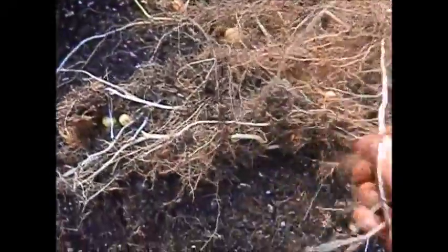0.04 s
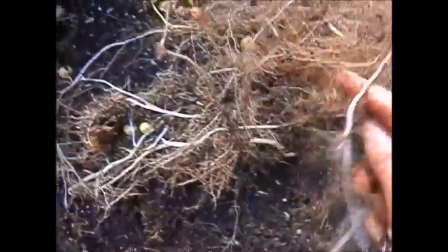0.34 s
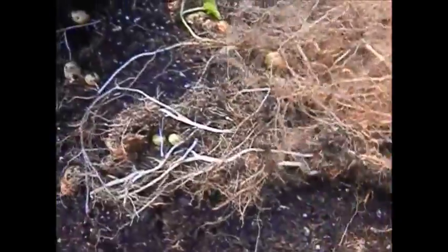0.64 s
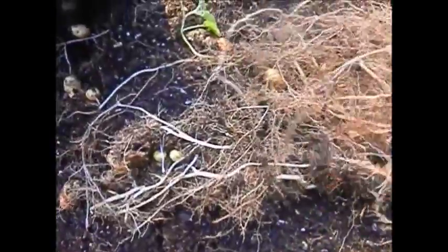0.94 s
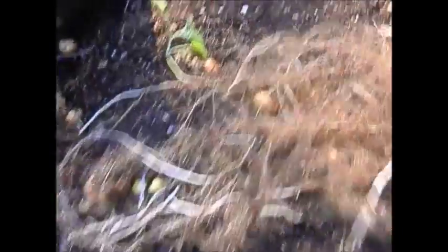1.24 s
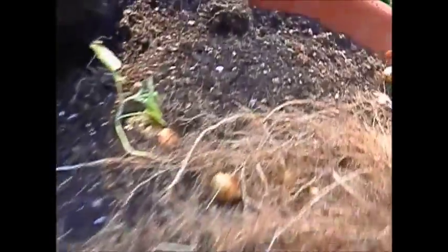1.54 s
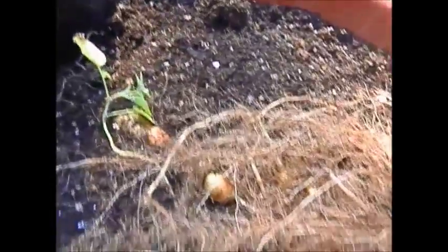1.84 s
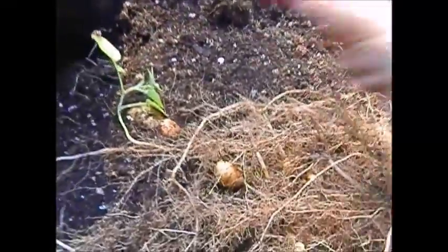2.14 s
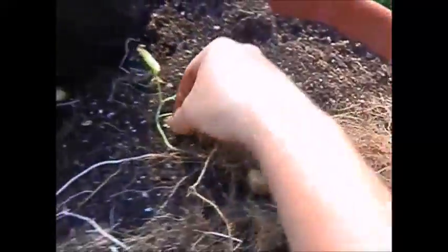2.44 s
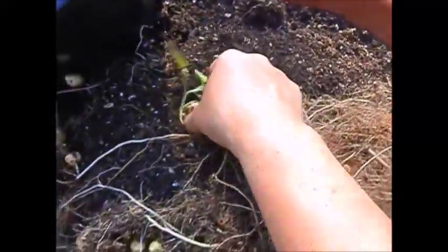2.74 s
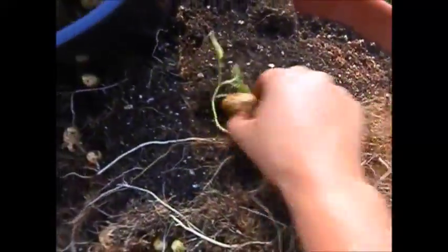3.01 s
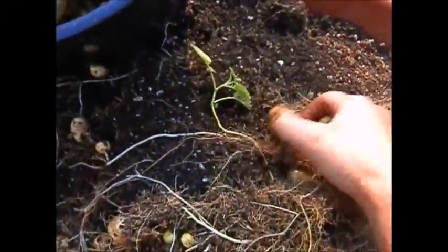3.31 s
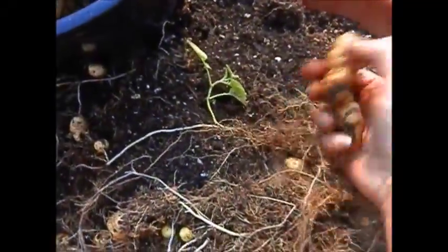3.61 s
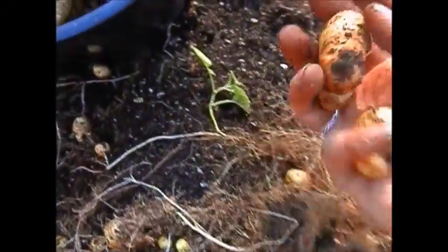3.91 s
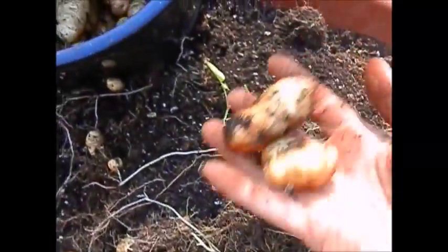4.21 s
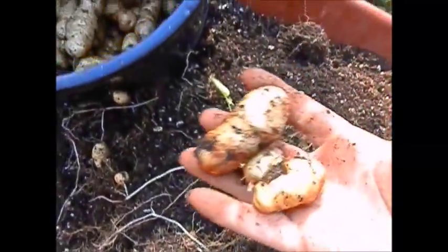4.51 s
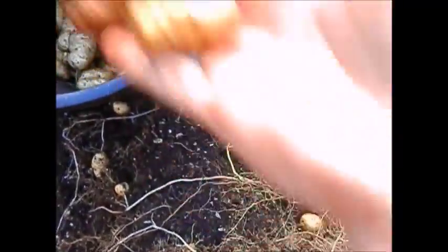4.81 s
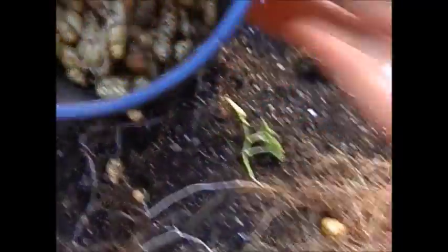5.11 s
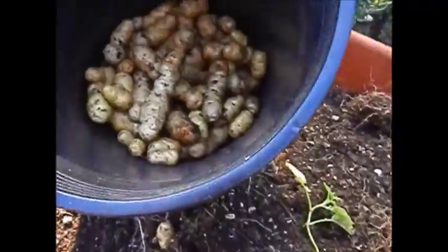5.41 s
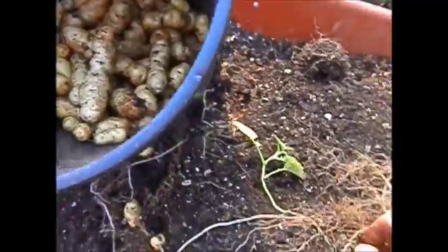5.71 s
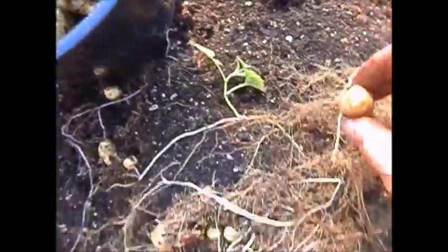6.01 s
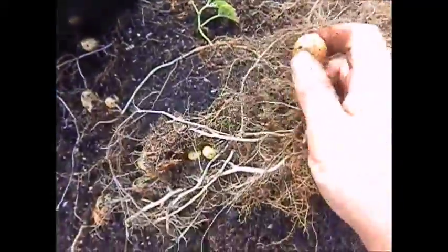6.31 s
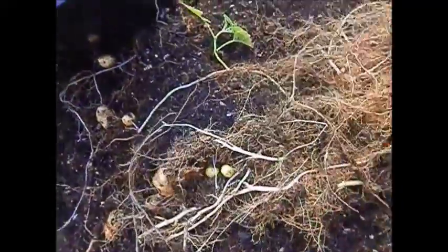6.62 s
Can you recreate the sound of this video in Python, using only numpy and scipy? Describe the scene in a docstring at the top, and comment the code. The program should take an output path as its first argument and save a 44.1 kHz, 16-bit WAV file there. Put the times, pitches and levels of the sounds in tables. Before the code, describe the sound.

Outdoors, distant engines hold a low, wavering drone. Close by, a hand rustles faintly through dry roots in potting soil, with brief crisp tears and a small snap. After a quieter stretch, a handful of potatoes tumbles into a plastic bucket with quick hollow knocks, the loudest event, ending in a sharp crack. Soft rustling and another snap follow. A camera lens ticks faintly beside the microphone in spells.

```python
"""Dry roots rustle and tear under a hand pulling small potatoes out of potting soil, outdoors.
About five seconds in, the potatoes drop into a plastic bucket, knocking and setting it ringing.
Far off, two engines drone and beat against each other, slowly speeding up.
Close to the microphone, the camera's lens mechanism ticks faintly, in spells, on a 15 Hz clock."""
import sys
import numpy as np
from scipy import signal
from scipy.fft import rfft, irfft
from scipy.io import wavfile
from scipy.ndimage import map_coordinates

SR = 44100
rng = np.random.default_rng(int(sys.argv[2]) if len(sys.argv) > 2 else 0)


def store_pcm(level_fs):
    """Save levels as 16-bit WAV."""
    pcm = np.round(np.clip(level_fs, -1, 1) * 32767).astype(np.int16)
    wavfile.write(sys.argv[1], SR, np.atleast_2d(pcm).T)


N = 297675
TIME = np.arange(N) / SR


def amp(db):
    """Decibels to gain."""
    return 10 ** (np.asarray(db) / 20)


def unit(x):
    """Scales to rms 1."""
    return x / np.sqrt(np.mean(x ** 2) + 1e-20)


def blow(x):
    """Scales a short sound to the energy of 5 ms at rms 1."""
    return x / np.sqrt(np.sum(x ** 2) / (.005 * SR))


def add(mix, s, sound):
    """Puts a sound into the mix at s seconds."""
    part = mix[max(round(s * SR), 0):][:len(sound)]
    part += sound[:len(part)]


def curves(rows):
    """Each column of a table of (seconds, ..) rows, at every sample."""
    s, *columns = np.transpose(rows)
    return [np.interp(TIME, s, c) for c in columns]


def wander(rate):
    """Smooth random drift of rms near 1, changing about rate times a second."""
    knots = rng.standard_normal(512)
    grid = np.arange(0, N + 256, 256)
    drift = map_coordinates(knots, [grid / SR * rate], mode="wrap")
    return np.interp(np.arange(N), grid, drift)


def movements(rows):
    """Gain over time of movements that each swell to a peak and die away a little faster."""
    power = np.zeros(N)
    for s, length, db in rows:
        away = (TIME - s) / (length * np.where(TIME < s, 0.67, 0.5))
        power += (amp(db) / (1 + away ** 2 / 2) ** 2) ** 2
    return np.sqrt(power)


def response(points, hz):
    """Gain of a (Hz, dB) spectrum at the given frequencies."""
    f, db = np.transpose(points)
    return amp(np.interp(np.log(hz + 1), np.log(f), db))


def coloured(x, points):
    """Gives a long sound a spectrum; rms 1."""
    gain = response(points, np.fft.rfftfreq(len(x), 1 / SR))
    return unit(irfft(rfft(x) * gain, len(x)))


def impulse(points, corner_hz=np.inf, size=2048):
    """Causal click with this spectrum; a soft contact dulls it above the corner."""
    hz = abs(np.fft.fftfreq(size, 1 / SR))
    log_gain = np.log(response(points, hz) / (1 + (hz / corner_hz) ** 2) ** 2)
    return np.fft.ifft(np.exp(signal.hilbert(log_gain).conj())).real


def burst(t60, rise, size=2048):
    """Noise that swells quickly and dies: the dense ringing of a small object."""
    t = np.arange(size) / SR
    return rng.standard_normal(size) * amp(-60 * t / t60) * (1 - np.exp(-t / rise))


def ring(modes, corner_hz=np.inf, detune=0, size=8192):
    """Dying (Hz, dB, t60) modes, optionally detuned; a soft contact weakens the high ones."""
    out, t = np.zeros(size), np.arange(size) / SR
    for hz, db, t60 in modes:
        pitch = hz * (1 + detune * rng.uniform(-1, 1))
        out += amp(db - 60 * t / t60) * np.sin(2 * np.pi * pitch * t) / (1 + (hz / corner_hz) ** 2)
    return out


def crackle(count, per_s, spread_db):
    """A train of tiny breaks, most small and a few large."""
    sizes = amp(spread_db * np.minimum(rng.exponential(1, count), 4))
    return unit(rng.standard_normal(count) * sizes * (rng.random(count) < per_s / SR))


# Open air with microphone hiss, and handling rumble. Each row: frequency in Hz, relative level in dB.
AIR_COLOUR = [(20, -3), (50, -1), (130, 3), (200, -7), (330, -10), (480, -11), (650, -15), (850, -19),
              (1200, -29.5), (2000, -40), (4000, -43), (6000, -43), (9000, -34), (15000, -31.5)]
RUMBLE_COLOUR = [(15, -10), (27, 3), (42, 7), (70, 1), (150, 2), (400, -43.5)]
# Sways of the hand-held camera. Each row: peak time and length in seconds, level in dB.
CAMERA_BUMPS = [(4.7, 0.2, -45), (5.11, 0.12, -26.5), (5.345, 0.12, -32.5), (5.8, 0.6, -44),
                (6.36, 0.31, -40.5)]

def air():
    """Steady distant wash and hiss, with a low rumble as the camera moves."""
    wash = amp(-44 + 0.16 * wander(3.8)) * coloured(rng.standard_normal(N), AIR_COLOUR)
    rumble = movements(CAMERA_BUMPS) * coloured(rng.standard_normal(N), RUMBLE_COLOUR)
    return wash + rumble


def engine_order(rate, multiple, fading, fade_rate):
    """One harmonic of the firing rate, rms 1; the moving air shifts its level and phase."""
    angle = 2 * np.pi * (multiple * np.cumsum(rate) / SR + rng.random())
    in_phase = (1 + fading * wander(fade_rate)) * np.cos(angle)
    return unit(in_phase + fading * wander(fade_rate) * np.sin(angle))


# Two engines, far off. Each row: time in seconds, firing rate of the first and the second in Hz.
FIRING_RATES = [(0, 15.56, 17.0), (1.1, 15.58, 17.04), (1.8, 15.78, 17.25), (3.0, 15.42, 17.08),
                (4.2, 15.9, 17.48), (5.5, 16.25, 17.88), (6.75, 17.41, 19.06)]
# The first one's drone. Each row: multiple of its rate, base level in dB at low and at high revs.
FIRST_ORDERS = [(4, -41, -42), (5, -42.5, -46), (7, -46.5, -46.5), (8, -38, -45), (9, -43, -48.5),
                (11, -49.5, -52), (12, -49.5, -46), (16, -58, -52.5)]
# The second one's drone, and the first one's whine. Each row: multiple of the rate, base level in dB.
SECOND_ORDERS = [(3, -83), (4, -56), (5, -45), (7, -38), (8, -50.5), (9, -58.5), (11, -46.5), (15, -65),
                 (17, -76)]
WHINE_ORDERS = [(30, -6.5), (32, -13.5), (36, -2.5), (37, -1.5), (40, 0.5), (41, -5), (44, -8.5),
                (45, -8.5), (49, -11.5)]
# How the air carries them to the microphone. Each row: time in seconds, then gains in dB
# for the second engine, the whine and the top orders of the first engine's drone.
AIR_CARRY = [(0, 3.5, -62.5, -12), (1.1, 1, -61.5, 0.5), (2.7, -4, -60.5, -3.5), (3.6, 3, -63, -3),
             (4.7, -6, -51.5, 4), (5.7, -11, -53, 2), (6.2, -7.5, -58.5, 0), (6.75, -6.5, -65, -20)]

def engines():
    """Two stacks of low orders beat, a little apart in speed, under a rougher whine."""
    first_hz, second_hz = curves(FIRING_RATES)
    second_db, whine_db, top_db = curves(AIR_CARRY)
    idle_hz, revved_hz = 15.6, 16.15
    revs = np.clip((first_hz - idle_hz) / (revved_hz - idle_hz), 0, 1)
    first = np.zeros(N)
    for k, low, high in FIRST_ORDERS:
        level_db = low + revs * (high - low) + top_db * (k >= 12)
        first += amp(level_db) * engine_order(first_hz, k, fading=.26, fade_rate=3)
    second = sum(amp(db) * engine_order(second_hz, k, fading=.78, fade_rate=2.212)
                 for k, db in SECOND_ORDERS)
    whine = sum(amp(db) * engine_order(first_hz, k, fading=.99, fade_rate=14) for k, db in WHINE_ORDERS)
    return first + amp(second_db) * second + amp(whine_db) * whine


# The lens hunting for focus. Each row: start and end in seconds, level in dB, share of beats that tick.
FOCUS_HUNTS = [(0.62, 0.8, -53, 0.9), (1.42, 2.12, -58, 0.7), (2.15, 2.8, -52.5, 0.96),
               (3.15, 3.46, -52, 1.0), (3.75, 4.13, -53.5, 0.85), (4.42, 4.95, -52, 0.5),
               (5.42, 6.27, -48.5, 0.99)]
# Its large moves. Each row: time in seconds, level in dB, number of steps.
FOCUS_MOVES = [(0.04, -48.5, 1), (0.17, -48.5, 1), (0.3, -48.5, 1), (0.57, -48.5, 4), (0.9, -50.5, 2),
               (1.24, -45.5, 1), (1.37, -52, 1), (1.57, -51, 1), (1.9, -51, 1), (2.31, -47.5, 1),
               (2.71, -47, 1), (2.97, -45.5, 3), (3.11, -46.5, 2), (3.57, -51, 1), (3.71, -50.5, 1),
               (4.31, -50, 1), (4.71, -47, 1), (5.38, -45.5, 3), (5.58, -47.5, 3), (5.71, -43.5, 1),
               (5.91, -42.5, 1), (6.04, -42.5, 1), (6.31, -43, 1), (6.58, -46.5, 1)]

def lens_moves():
    """(seconds, dB, steps) of small hunting steps and large moves, all on the lens's 15 Hz clock."""
    clock = np.arange(0.0355, N / SR, 0.066748)
    chance = rng.random(len(clock))
    moves = {}
    for start, end, db, share in FOCUS_HUNTS:
        for s in clock[(start <= clock) & (clock <= end) & (chance < share)]:
            moves[s] = (db, 1)
    for s, db, steps in FOCUS_MOVES:
        nearest_beat = clock[np.argmin(abs(clock - s))]
        moves[nearest_beat] = (db, steps)
    return [(s, db, steps) for s, (db, steps) in moves.items()]


# The lens's rattle, right beside the microphone. Each row: frequency in Hz, relative level in dB.
TICK_COLOUR = [(300, 6), (700, 18), (1200, 0), (1500, 0), (1850, 1.5), (2400, -0.5), (2850, -0.5),
               (3250, -13.5), (3700, 1.5), (4400, 2), (5100, -1), (5600, -1.5), (6600, -3), (7500, -3.5),
               (8700, -2.5), (10500, -3), (15000, -14)]
# The camera body's modes. Each row: frequency in Hz, relative level in dB, t60 in seconds.
CAMERA_MODES = [(1219, 4.5, 0.075), (1841, 3.5, 0.059), (2005, -1.5, 0.075), (2410, -1.5, 0.073),
                (4486, -3.5, 0.081), (4710, 8, .025), (8410, 7, 0.02)]

def lens():
    """The lens moves one step or a few in quick succession; each rattles and rings the camera body."""
    out, body = np.zeros(N), impulse(TICK_COLOUR)
    step_gap_s = .0047
    for s, db, steps in lens_moves():
        for onset in s + step_gap_s * np.arange(round(steps)):
            rattle = burst(t60=0.016, rise=0.00075) + amp(-19.5) * burst(t60=0.082, rise=0.0022)
            add(out, onset, amp(db + 5) * blow(signal.fftconvolve(rattle, body)))
            add(out, onset, amp(db - 1) * blow(ring(CAMERA_MODES, detune=0.036, size=2048)))
    return out


# A stem scraping in the pot. Each row: peak time and length in seconds, level in dB.
STEM_SCRAPES = [(0.42, 0.19, -64.5), (0.68, 0.17, -71)]
# Its rasp. Each row: frequency in Hz, relative level in dB.
SCRAPE_COLOUR = [(1200, -14), (1750, -7), (2050, 0), (2350, -30), (3500, -45)]

def stem():
    """A stiff stem slips over the soil with a faint, narrow rasp."""
    return movements(STEM_SCRAPES) * coloured(crackle(N, per_s=540, spread_db=-2), SCRAPE_COLOUR)


# The hand down in the pot. Each row: start in seconds, level in dB, upper resonance in Hz,
# its relative level in dB.
POT_SCUFFS = [(1.163, -36.5, 720, -15), (1.304, -35.5, 1500, -10), (1.313, -39.5, 1690, -15)]

def scuffs():
    """A brief rub excites the pot's hollow resonance and an upper one."""
    out, t = np.zeros(N), np.arange(1024) / SR
    hollow_hz = 453
    for s, db, upper_hz, upper_db in POT_SCUFFS:
        for hz, level_db in ((hollow_hz, db), (upper_hz, db + upper_db)):
            resonance = t * ring([(hz, 0, .005)], size=len(t))  # swells first, so its skirts are steep
            rub = burst(t60=0.026, rise=0.0016)
            add(out, s, amp(level_db) * blow(signal.fftconvolve(rub, resonance)))
    return out


# Nearby, the hand strokes through the roots and drags their mat over the soil.
# Each row: peak time and length in seconds, level in dB.
HAND_STROKES = [(0.04, 0.43, -53), (0.65, 0.46, -58), (1.03, 0.25, -52.5), (1.42, 0.39, -57),
                (2.25, 0.5, -63), (2.65, 0.28, -59), (3.72, 0.2, -62.5), (5.2, 0.39, -65),
                (5.75, 0.63, -65.5), (6.19, 0.31, -55.5), (6.54, 0.17, -57)]
MAT_DRAGS = [(0.01, 0.095, -49), (0.36, 0.28, -63), (0.65, 0.27, -69), (1.37, 0.09, -51), (1.6, 0.26, -81)]
# The bright rustle and the dull rub. Each row: frequency in Hz, relative level in dB.
ROOT_COLOUR = [(400, -51), (1200, -7), (2500, -9), (4000, -7.5), (6000, -3.5), (8500, 7), (11000, 3.5),
               (13000, 2), (16000, -10)]
DRAG_COLOUR = [(200, 1), (500, 13.5), (1200, -2.5), (1900, -1.5), (2400, -15), (3500, -23), (8000, -52)]

def roots():
    """Dry roots and crumbs crackle under the hand; the mat rubs over the soil."""
    stir = np.hypot(movements(HAND_STROKES), amp(-69))  # the floors: roots settling between movements
    drag = np.hypot(movements(MAT_DRAGS), amp(-72))
    fine = amp(2 * wander(40)) * crackle(N, per_s=4500, spread_db=2.5)
    coarse = crackle(N, per_s=70, spread_db=3.5)
    rustle = stir * coloured(fine + amp(-5) * coarse, ROOT_COLOUR)
    rub = drag * amp(2 * wander(28.8)) * coloured(crackle(N, per_s=1600, spread_db=-2.5), DRAG_COLOUR)
    return rustle + rub


# Roots tearing in the pot. Each row: start in seconds, level in dB, length in seconds, centre in Hz.
ROOT_TEARS = [(0.01, -50, 0.0032, 6900), (0.133, -52, 0.024, 13000), (0.265, -45.5, 0.0027, 8360),
              (0.287, -47.5, 0.0059, 8300), (0.503, -41, 0.033, 9000), (0.536, -26.5, 0.0054, 8550),
              (0.583, -29.5, 0.012, 8100), (0.608, -44.5, 0.029, 7900), (1.034, -52.5, 0.014, 8500),
              (1.099, -50.5, 0.018, 8500), (1.139, -46.5, 0.025, 8900), (1.349, -54, 0.035, 10000),
              (2.4, -47.5, 0.0044, 11100), (2.59, -47.5, 0.0087, 11300), (2.657, -55, 0.028, 10500),
              (3.731, -54, 0.054, 9800), (6.178, -43.5, 0.011, 9450), (6.368, -55, 0.017, 9100),
              (6.55, -37.5, 0.016, 10400)]

def tears():
    """A bundle of fibres gives way in one short spurt of tiny breaks."""
    out, t = np.zeros(N), np.arange(8192) / SR
    for s, db, length, centre_hz in ROOT_TEARS:
        octaves = np.log2((np.fft.rfftfreq(len(t), 1 / SR) + 1) / centre_hz)
        band = 1 / (1 + (abs(octaves) / .5) ** 6) + 0.036
        breaks = crackle(len(t), per_s=3800, spread_db=2.5)
        fibres = unit(irfft(rfft(breaks) * band))
        swell = t / (length * 0.59)
        add(out, s, amp(db) * fibres * swell * np.exp(1 - swell))
    return out


# Dry snaps, close by. Each row: start in seconds, level in dB, resonance in Hz, its relative level in dB.
DRY_SNAPS = [(0.985, -27, 3100, -21.5), (5.3067, -16, 4700, -22), (5.3122, -18, 4860, -7.5),
             (5.3157, -31, 4700, -7), (5.32, -32.5, 2400, -4), (6.3488, -28, 3060, -16)]
# Their crack. Each row: frequency in Hz, relative level in dB.
SNAP_COLOUR = [(500, 2), (1300, -17), (4000, -37), (4900, -9), (6800, -1.5), (8500, 7.5), (11000, 2.5),
               (12500, 1), (14000, 4), (16000, 2.5)]

def snaps():
    """Bright cracks of a few milliseconds, each with one resonance and a faint tail."""
    out = np.zeros(N)
    for s, db, ring_hz, ring_db in DRY_SNAPS:
        crack = burst(t60=0.0032, rise=0.00094) + amp(-24.5) * burst(t60=0.036, rise=0.0013)
        add(out, s, amp(db) * blow(signal.fftconvolve(crack, impulse(SNAP_COLOUR))))
        add(out, s, amp(db + ring_db) * blow(signal.fftconvolve(crack, ring([(ring_hz, 0, .005)]))))
    return out


# Potatoes hitting the bucket and each other, near the microphone.
# Each row: start in seconds, level in dB, knock pitch in Hz, relative level of the bucket's ring in dB.
POTATO_HITS = [(5.0429, -13, 295, -15), (5.062, -18.5, 676, -3), (5.078, -20, 1180, 1),
               (5.109, -16.5, 250, -1), (5.1301, -19.5, 410, -2), (5.159, -34, 304, -9),
               (5.2195, -18, 554, 2.5), (5.264, -23.5, 706, 1), (5.289, -34.5, 650, 1)]
# The scuff of each hit. Each row: frequency in Hz, relative level in dB.
THUD_COLOUR = [(20, -41), (90, -8.5), (180, 10.5), (400, 2.5), (550, 0.5), (900, 0), (1450, -5), (2200, -7),
               (3000, -15), (5000, -9)]
# The plastic bucket's modes. Each row: frequency in Hz, relative level in dB, t60 in seconds.
BUCKET_MODES = [(174, -13, 0.13), (204.3, -1.5, 0.15), (306.8, 2.5, 0.21), (498, 2.5, 0.047),
                (573, -27, 0.053), (732, 5.5, 0.067), (860, -34, 0.069), (1230, -27, 0.047),
                (1540, -18, 0.15)]

def potatoes():
    """Each potato gives a damped knock with a scuff, crushes some crumbs and sets the bucket ringing."""
    out, t = np.zeros(N), np.arange(2048) / SR
    squash_s, peak_cycles = .0015, 0.79  # first touch to full force; cycles to the knock's fullest
    for s, db, hz, ring_db in POTATO_HITS:
        corner_hz = 2.86 * hz  # a harder contact is both higher and brighter
        cycles = hz * t
        knock = cycles * np.exp(-cycles / peak_cycles) * np.sin(2 * np.pi * cycles)
        scuff = signal.fftconvolve(burst(t60=.033, rise=.001), impulse(THUD_COLOUR, corner_hz))
        grit = signal.fftconvolve(burst(t60=0.081, rise=0.00052), impulse(ROOT_COLOUR))
        add(out, s + squash_s, amp(db - 4) * blow(knock))
        add(out, s, amp(db) * blow(scuff))
        add(out, s, amp(db - 27.5) * blow(grit))
        add(out, s + squash_s, amp(db + ring_db) * blow(ring(BUCKET_MODES, corner_hz)))
    return out


def scene():
    """Everything as it reaches the one microphone."""
    mix = engines() + air() + roots() + stem() + tears() + scuffs() + snaps() + potatoes() + lens()
    return mix[None]


def record(dry):
    """The recorder passes nothing above about 16 kHz."""
    lowpass = signal.firwin(401, 15950, window=("kaiser", 9), fs=SR)
    return signal.oaconvolve(dry, lowpass[None], "same")


dry = scene()
out = record(dry)
store_pcm(out)
```